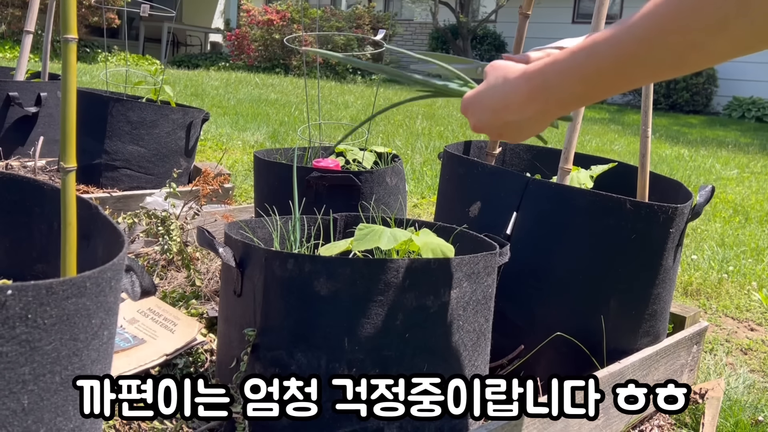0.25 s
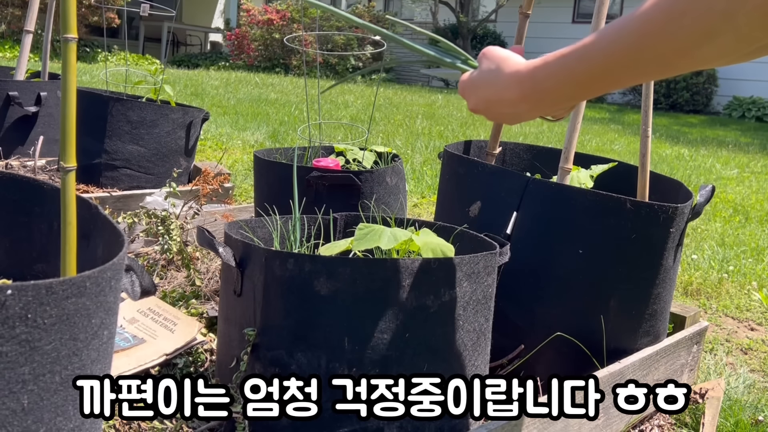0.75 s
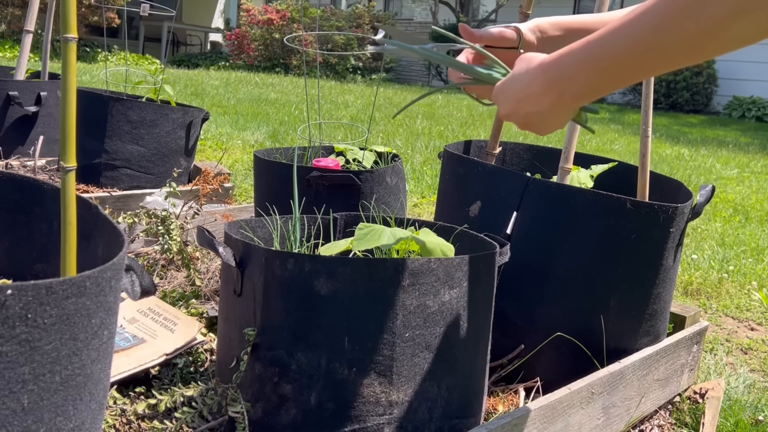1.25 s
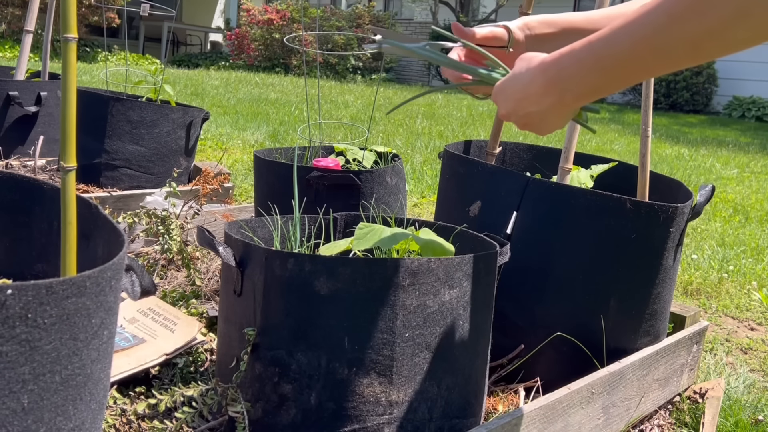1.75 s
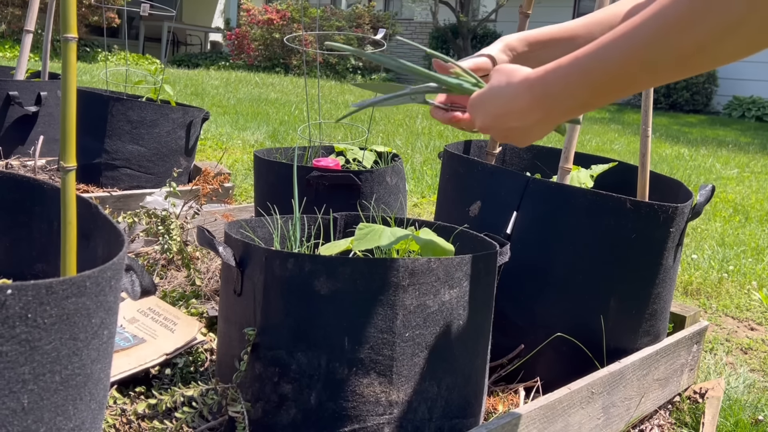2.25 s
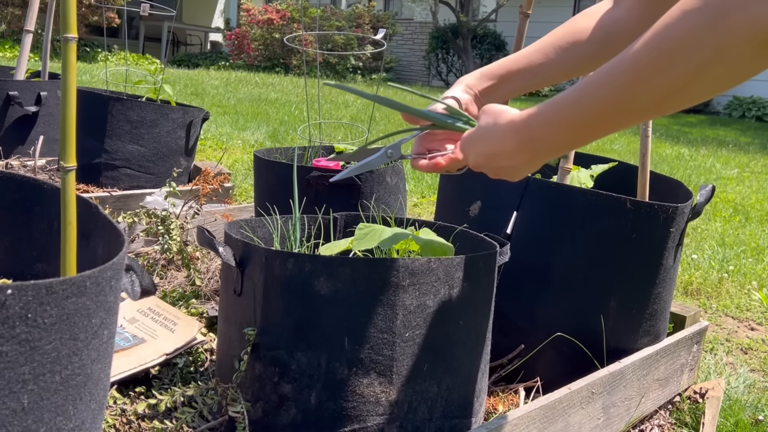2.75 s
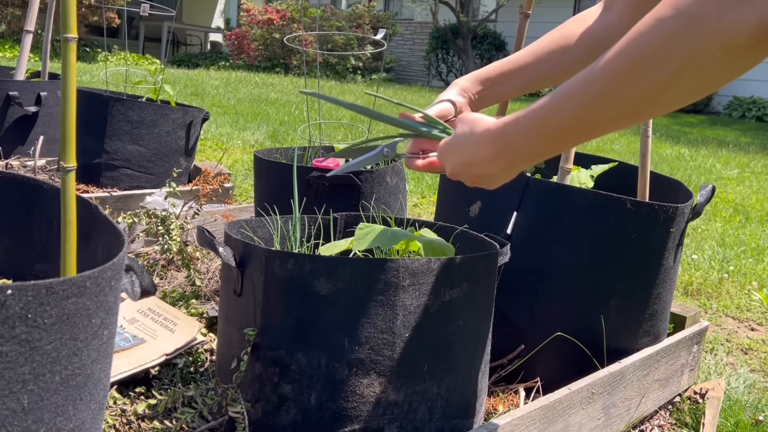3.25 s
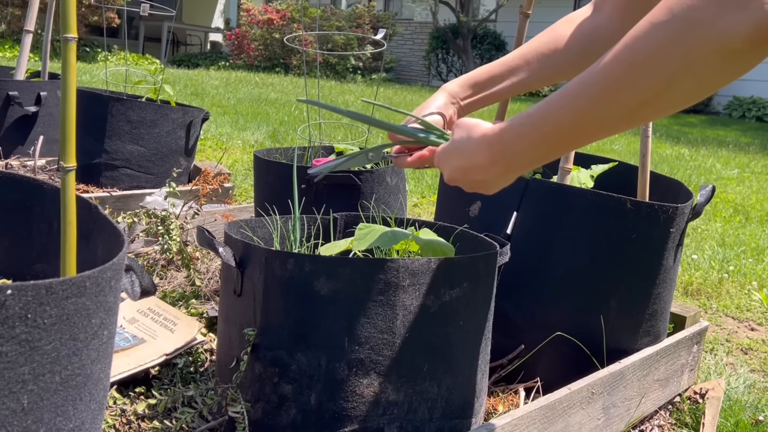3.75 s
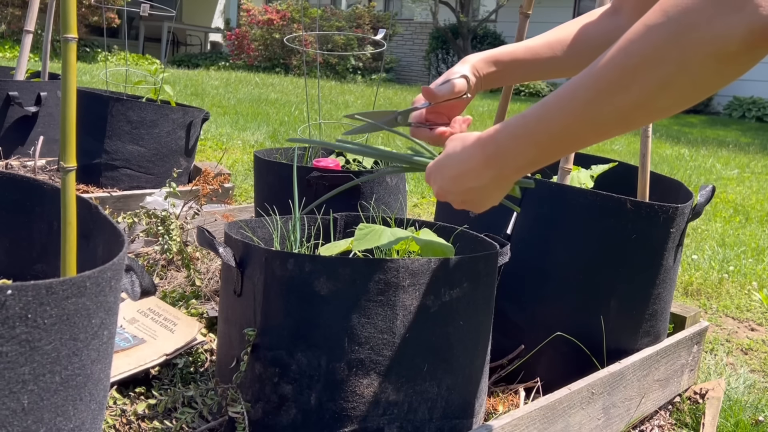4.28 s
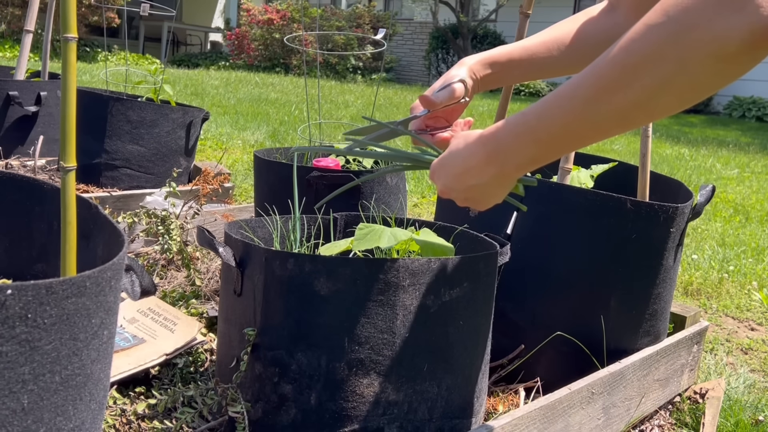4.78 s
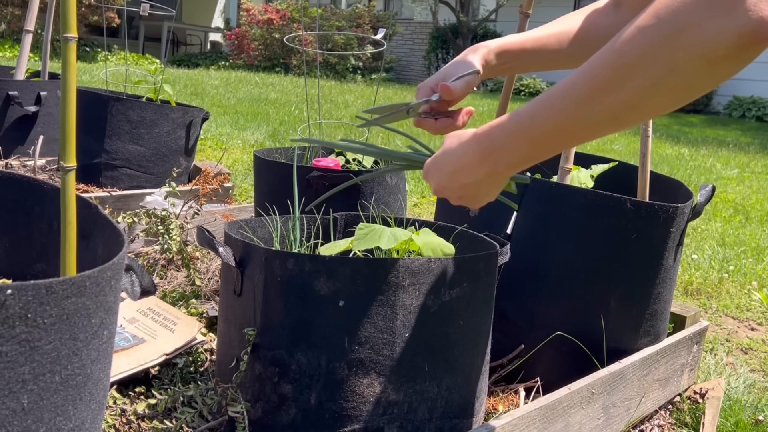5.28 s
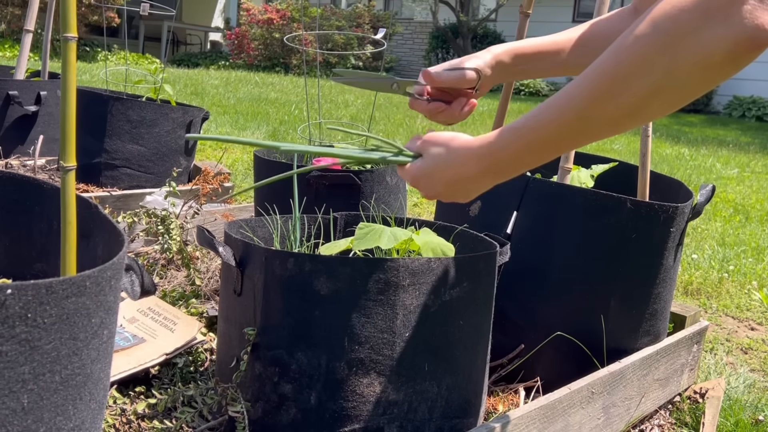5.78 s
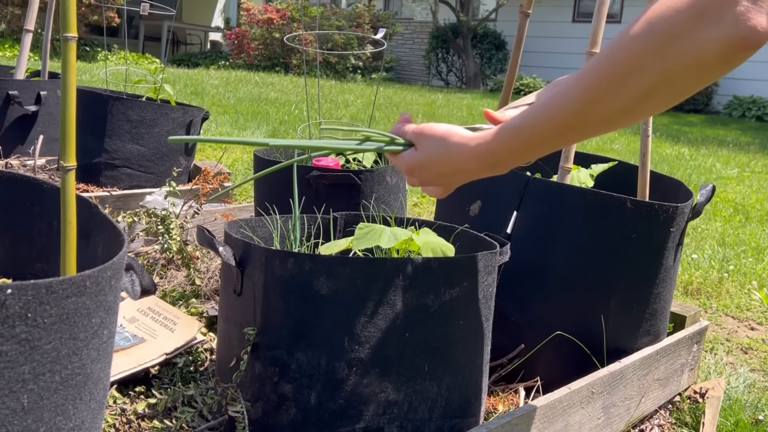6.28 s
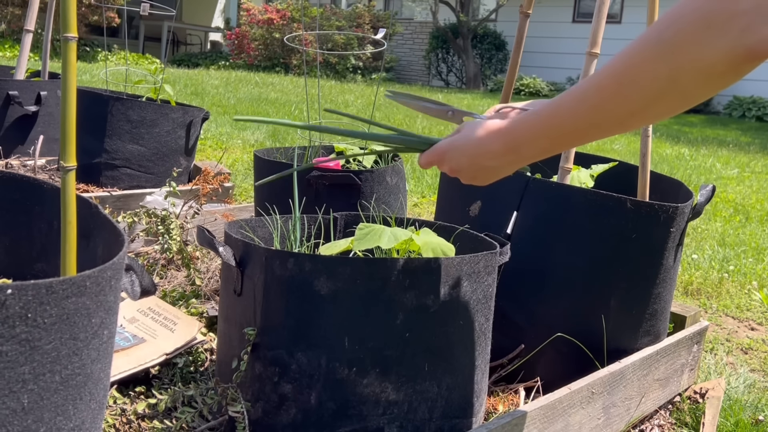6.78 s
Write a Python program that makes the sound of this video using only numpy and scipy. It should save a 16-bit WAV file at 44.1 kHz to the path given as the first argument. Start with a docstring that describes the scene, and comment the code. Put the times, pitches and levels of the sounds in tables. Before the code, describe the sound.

Close stereo pickup outdoors: five sharp, thin scissor snips through green stalks, unevenly spaced, with scraping blades and small fibre cracks just before closure. A dull, very short wall echo follows each. Behind them lie deep traffic rumble, faint motor hum, soft town wash and leaf hiss, with weak distant bird whistles and a few low bumps of air. Near the end the plastic handle knocks lightly, then only background remains.

```python
"""Far traffic and a motor murmur under faint blade ticks, then kitchen scissors snip green stalks five times.
Each snip is a rattling burst of contacts through the blade modes, with fibre cracks, gritty rubbing
and a dull wall echo; the plastic handle is tapped near the end. The scissors lie to one side of a
two-port microphone. Around them gliding sines peep as a bird, short low pulses puff on the microphone,
and shaped noise makes traffic, town, leaves, wind and fizz; narrow resonances and a throbbing sine make motors."""
import sys
import numpy as np
from scipy import signal
from scipy.fft import rfft, irfft
from scipy.io import wavfile
from scipy.ndimage import uniform_filter1d

SR = 44100
rng = np.random.default_rng(int(sys.argv[2]) if len(sys.argv) > 2 else 0)


def transcribe(u):
    """Save the signal u as a 16-bit wav file named by the first command-line argument.

    u: samples, shape (n,) or (channels, n), limited to [-1, 1]; the rate is SR.
    q: integer samples, one column per channel.
    """
    v = np.clip(np.atleast_2d(u).T, -1, 1)
    q = np.round(v * 32767).astype(np.int16)
    wavfile.write(sys.argv[1], SR, q)


N = 310023

# blades snapping shut: (time [s], energy [dB], colour at 2, 3, 4.3, 6.2, 11, 13 and 15 kHz
# [dB re 8 kHz, seven columns], rattle t60 [s], bounce strength [re rms 1 noise])
SNAP_BLOWS = [(1.9631, -12, -5, 2, 3, 4, 9, 11, 10, 0.028, 5.5),
              (3.0285, -20.5, -10, -4, 0.5, 2.5, 4.5, 10, -1, 0.022, 7),
              (3.7365, -11.5, 0, 3.5, 6.5, 7.5, 15, 13.5, 13.5, 0.026, 5.1),
              (4.9181, -8.5, -10, -11, -4.5, 0.5, 2, 6, 8.5, 0.023, 3.3),
              (5.5522, -5.5, -23.5, -23, -10, -7, -12, -2.5, -10.5, 0.021, 2.46)]
SNAP_PAN_DB = 0.5


def snaps():
    """The two steel blades meet at full closure and rattle against each other."""
    return blades(SNAP_BLOWS, SNAP_PAN_DB)


# fibres cracking and small blade ticks: (time [s], energy [dB], low, middle and treble colour
# [dB re 8 kHz, three columns])
TICK_BLOWS = [(0.036, -47, 5, 7, -8), (0.115, -40, -6, -3, -15), (.1655, -62, -14, -11, -4),
              (1.914, -55, -13, -10, 3), (1.927, -43, -4, 4, -2), (1.929, -44, -2, 6, -3),
              (1.936, -36, 0, 15, -6), (1.942, -32.5, 10, 13, -6), (1.952, -33, -25, -10, -1),
              (2.3, -43, 4, 15, -10), (3.161, -54, -8, -5, 3), (3.706, -44, -21, -14, 0),
              (3.718, -41, -14, -8, 6), (3.7295, -31, -22, -16, 6), (4.882, -48, -15, -12, 4),
              (4.888, -31.5, -15, 10, 9), (4.899, -31.5, -2, 13, 0), (4.902, -36, -3, 4, 2),
              (4.905, -36, 3, 0, 0), (4.9085, -40, -4, 2.5, -3), (5.1932, -43.5, -18, -15, 5),
              (5.427, -43, 15, 8, 1), (5.533, -38, -16, -13, -1.5), (5.539, -31, -25, -21, 6)]
TICK_T60_S, TICK_BOUNCE, TICK_PAN_DB = 0.018, 3.5, 1


def ticks():
    """Small blows, each with its own share of low, middle and treble range."""
    rows = []
    for s, level_db, low, mid, treble in TICK_BLOWS:
        colour = (low, low, mid - 3.0, mid, treble, treble, treble)
        rows.append((s, level_db, *colour, TICK_T60_S, TICK_BOUNCE))
    return blades(rows, TICK_PAN_DB)


# resonances of the steel blades: (frequency [Hz], width [Hz], lift [dB])
BLADE_MODES = [(2040, 180, 7.5), (3040, 340, 7), (4520, 406, 1.5), (6170, 500, 5), (7710, 360, 11),
               (8810, 930, 9.5), (11100, 1094, 4.5), (12900, 800, 0.5), (15140, 720, 3)]


def blades(rows, pan_db):
    """Each blow is a wide crack, lifted at the blade modes; how the blades meet sets its colour."""
    out, hz = np.zeros((2, N)), np.fft.rfftfreq(2048, 1 / SR)
    modes_db = sum(db / (1 + (2 * (hz - f) / width) ** 2) for f, width, db in BLADE_MODES)
    for s, level_db, db2, db3, db4, db6, db11, db13, db15, t60, bounce in rows:
        # thin steel sends no bass
        colour = [(500, db2 - 10.0), (2000, db2), (3000, db3), (4300, db4),
                  (5200, (db4 + db6) / 2 + 5.5), (6200, db6), (8000, 0), (11000, db11),
                  (13000, db13), (15300, db15), (16000, db15 - 11.0), (16800, db15 - 19.0)]
        response = causal(read(colour, hz) + modes_db)
        contacts = rattle(t60, alike=0.92, hard=9, bounce=bounce)
        crack = signal.fftconvolve(contacts, response, axes=1)
        add(out, s, gain_of(level_db) * crack / np.linalg.norm(crack[0]), pan_db)
    return out


RISE_S, BOUNCE_S = 0.0003, 0.0007  # contacts build up, then the bounce follows the hard contact
BODY_HZ, BODY_T60_S, BODY_LAG_S = 5820, 0.17, 0.0003  # below BODY_HZ contacts die sooner and speak later


def rattle(t60, alike, hard, bounce):
    """A hard contact, its bounce and quick uneven contacts around them; the lower modes speak
    a moment later and reach each port through slightly other near reflections."""
    t = np.arange(2048) / SR
    both, left, right, size = rng.standard_normal((4, len(t)))
    own = np.sqrt(1 - alike ** 2)
    contacts = np.array([both, alike * both + own * left, alike * both + own * right])
    contacts *= gain_of(2 * size) * np.minimum(t / RISE_S, 1)
    first = round(RISE_S * SR)
    contacts[:, first] = hard
    contacts[:, first + round(BOUNCE_S * SR)] = bounce
    low = signal.filtfilt(*signal.butter(N=2, Wn=BODY_HZ, fs=SR), contacts)
    body = low[1:] * gain_of(-60 * t / BODY_T60_S)
    body = np.roll(body, round(BODY_LAG_S * SR), axis=1)
    treble = contacts[0] - low[0]  # the same in both ports
    return (treble + body) * gain_of(-60 * t / max(t60, .002))


# blades shearing and rubbing along each other: (peak time [s], upper-mode peak [dB], rise [s],
# fall [s], lower modes [dB re upper])
RUB_STROKES = [(.114, -85, .035, .045, 11), (.166, -78, .015, .07, 3), (.32, -96, .1, .1, 12),
               (1.958, -49.5, 0.033, 0.017, -4), (1.98, -74.5, 0.014, 0.09, 7.5),
               (2.072, -75.5, 0.025, 0.095, 3), (2.298, -82, 0.018, .06, -2), (3.0, -83, 0.08, 0.054, 4),
               (3.045, -93, 0.023, 0.13, 18.5), (3.119, -84, .05, .035, -10),
               (3.161, -70, 0.012, 0.024, -6), (3.731, -55, 0.02, .012, -4), (3.71, -81, 0.071, .05, 7),
               (3.755, -76.5, .012, 0.074, 9.5), (3.855, -75, 0.025, 0.05, -3),
               (4.914, -57, 0.035, 0.014, -1), (4.972, -77.5, .1, 0.076, 2.5),
               (5.038, -75, 0.022, .055, -7), (5.551, -55.5, 0.019, 0.0083, 3.5),
               (5.59, -84.5, 0.076, 0.08, 17), (5.676, -94, 0.089, .15, 12), (6.637, -99, 0.12, .15, 12)]
# lower rubbing modes: (frequency [Hz], width before narrowing [Hz], level [dB])
RUB_MODES = [(6860, 4100, 7), (9100, 300, 9), (11500, 900, -4), (12700, 1450, -8.5)]
RUB_SWING_DB, LOWER_SHARE = 25.5, 0.72  # swell depth, and the lower modes' share of it
RUB_FROM_HZ = 5000


def rub():
    """Grainy friction of steel on steel and stalk in the upper blade modes; the lower modes swell and fade less."""
    t, upper, lower = np.arange(N) / SR, np.zeros(N), np.zeros(N)
    for s, level_db, rise, fall, lower_db in RUB_STROKES:
        away = np.maximum((s - t) / rise, (t - s) / fall)
        upper += gain_of(level_db - RUB_SWING_DB * away) * (away < 1)
        lower += gain_of(level_db + lower_db - LOWER_SHARE * RUB_SWING_DB * away) * (away < 1)
    rough = uniform_filter1d(rng.standard_normal((2, N)), 90)
    fine, grit = rng.standard_normal((2, N)) * gain_of(3.4 * evened(rough))
    top = evened(resonate(resonate(fine, 15000, 1400), 15000, 1400))
    top = signal.sosfilt(signal.butter(N=12, Wn=15800, fs=SR, output="sos"), top)
    bottom = evened(ring(grit, RUB_MODES, widen=0.93))
    bottom = signal.lfilter(*signal.butter(N=4, Wn=RUB_FROM_HZ, btype="high", fs=SR), bottom)
    sound = upper * top + lower * bottom
    return np.array([sound, sound])


# the handle taps: (time [s], energy [dB], rattle t60 [s], left-right balance [dB])
HANDLE_TAPS = [(5.8622, -48, 0.0064, 4), (5.8715, -19, 0.016, 8.5), (5.889, -40, .006, -1)]
# resonances of the hollow plastic: (frequency [Hz], width [Hz], level [dB])
HANDLE_MODES = [(960, 250, -5.5), (2020, 140, -9), (2480, 120, -2), (3200, 280, 0.5), (4330, 900, -8),
                (6650, 740, -20), (7540, 370, -13.5), (9270, 470, -20)]


def handle():
    """A hollow plastic tap: uneven contacts ring the handle modes."""
    out = np.zeros((2, N))
    for s, level_db, t60, pan_db in HANDLE_TAPS:
        tap = ring(rattle(t60, alike=0.7, hard=20, bounce=0), HANDLE_MODES, widen=1)
        tap = signal.lfilter(*signal.butter(N=2, Wn=550, btype="high", fs=SR), tap)
        add(out, s, gain_of(level_db) * tap / np.linalg.norm(tap[0]), pan_db)
    return out


# how the two ports hear the scissors' side: (frequency [Hz], phase lead of the left port [rad])
PORT_LEAD = [(0, 0), (1000, -1.5), (2000, 0), (3000, 1.2), (4500, .8), (6000, .6), (7300, 1.4), (8000, 1),
             (10000, -3.1), (12000, -6.1), (14000, -9.6), (15500, -12.6), (22050, -12.6)]


def aside(pair):
    """Turns the phase of the left port as for sound from the scissors' side."""
    turn = np.exp(1j * np.interp(np.fft.rfftfreq(N, 1 / SR), *np.transpose(PORT_LEAD)))
    return np.array([irfft(rfft(pair[0]) * turn, N), pair[1]])


WALL_DB, WALL_T60_S = -29, 0.024


def garden(x):
    """A dull smeared echo from a wall, about 25 ms late, and a thin scatter from pots and hedges."""
    t = np.arange(SR // 4) / SR
    taps = rng.choice([-1., 1.], (2, len(t))) * (rng.random((2, len(t))) < .05)
    scatter = taps[0] * gain_of(-46 - 60 * t / .2) * (t > .004)
    wall_rise = np.clip((t - .0225) / 0.0022, 0, 1)
    wall = taps * gain_of(WALL_DB - 60 * (t - .0245) / WALL_T60_S) * wall_rise
    dull = signal.lfilter(*signal.butter(N=4, Wn=[4500, 9500], btype="band", fs=SR), wall)
    return signal.fftconvolve(x, scatter + dull, axes=1)[:, :N]


# bird peeps and low pips: (start time [s], length [s], first pitch [Hz], last pitch [Hz], level [dB],
# loudest point [share of length], flutter [dB], pitch waver [share])
BIRD_PEEPS = [(1.6, 0.035, 4850, 4980, -79, .45, 4, .006), (1.772, 0.04, 2650, 2720, -82, .4, 4, .006),
              (1.81, .05, 2700, 3050, -76.5, 0.3, 3, .008), (2.064, 0.03, 1520, 1480, -70.5, 0.35, 0, .008),
              (2.243, 0.085, 2620, 2850, -70, 0.68, 2, .004), (2.324, .05, 2790, 2750, -81, .45, 4, .004),
              (2.401, 0.045, 3200, 3280, -85, 0.4, 5.5, .015),
              (2.443, 0.073, 3300, 3610, -80, .65, 4.5, 0.011),
              (2.617, 0.019, 5950, 6600, -74, 0.4, 3, .006),
              (2.641, 0.0082, 6500, 4130, -66, 0.25, 2, .006),
              (4.708, 0.113, 3340, 3260, -80, 0.56, 3, .005), (4.715, 0.13, 4540, 4500, -80, .45, 3, .012),
              (4.985, .025, 2900, 2820, -80, .5, 1, .006), (5.34, .06, 5700, 5700, -80, 0.49, 4.5, .03),
              (5.42, 0.017, 1840, 1840, -79, 0.41, 4, .01), (5.45, 0.032, 1880, 1850, -80, .4, 4.5, .01)]
LEAVES_ECHO_DB, LEAVES_T60_S = -5, 0.03


def bird():
    """Thin gliding whistles far off, broken up by the air and the leaves that they cross."""
    out = np.zeros(N)
    waver, flutter = (evened(uniform_filter1d(v, 200)) for v in rng.standard_normal((2, N)))
    for s, length, from_hz, to_hz, level_db, top, flutter_db, share in BIRD_PEEPS:
        at = np.arange(round(s * SR), round((s + length) * SR))
        u = np.linspace(0, 1, len(at))
        arch = np.sin(np.pi * u ** (np.log(.5) / np.log(np.clip(top, .1, .9))))
        hz = (from_hz + (to_hz - from_hz) * u) * (1 + share * waver[at])
        level = np.sqrt(2) * gain_of(level_db + flutter_db * flutter[at]) * arch ** .8
        out[at] += level * np.sin(2 * np.pi * np.cumsum(hz) / SR)
    t = np.arange(4096) / SR
    leaves = rng.standard_normal((2, len(t))) * gain_of(-60 * t / LEAVES_T60_S)
    leaves *= gain_of(LEAVES_ECHO_DB) / np.linalg.norm(leaves[0])
    return out + signal.oaconvolve(out[None], leaves, axes=1)[:, :N]


# air puffing on the microphone: (centre offset from start is half the length)
# (start time [s], peak [dB], frequency [Hz], length [s], left-right balance [dB])
AIR_PUFFS = [(3.209, -38, 61.86, 0.026, 9), (3.676, -34.5, 61.5, 0.036, 3),
             (4.147, -30.5, 63.3, 0.037, 7.5), (6.419, -33, 56.6, 0.0556, 4), (6.452, -29, 66.6, 0.029, -2)]


def puffs():
    """Short low pushes of air, each an arched piece of a cosine."""
    out = np.zeros((2, N))
    for s, peak_db, hz, length, pan_db in AIR_PUFFS:
        t = np.arange(0, length, 1 / SR) - length / 2
        push = -gain_of(peak_db) * np.cos(2 * np.pi * hz * t) * np.cos(np.pi * t / length)
        add(out, s, np.array([push, push]), pan_db)
    return out


# lines of the motor: (frequency [Hz], width [Hz], level [dB])
MOTOR_LINES = [(216.45, 5.4, -68.5), (1119, 3.22, -89), (1185, 6, -86.5), (1256, 3, -96.5),
               (1298, 3.7, -90), (1333, 4.6, -91)]


def hum():
    """Wavering lines of a distant motor: noise through narrow resonances."""
    lines = [gain_of(db) * evened(resonate(rng.standard_normal(N), hz, width)) for hz, width, db in MOTOR_LINES]
    return sum(lines)


# slow course of the traffic, before each layer's trim; the drone follows the deep column too:
# (time [s], deep rumble level [dB], upper rumble level [dB])
TRAFFIC_LEVELS = [(0, -47, -52), (.4, -52.5, -49.5), (.9, -51, -54.5), (1.3, -53, -52.5),
                  (1.8, -54.5, -54.5), (2.3, -55, -54.5), (2.7, -51, -53), (3.1, -49, -55.5),
                  (3.5, -52.5, -53), (4, -49, -54), (4.5, -51.5, -53), (5, -54, -52.5), (5.5, -50, -52.5),
                  (6.1, -55, -54), (6.6, -49, -52), (7.03, -48, -54)]
ENGINE_DB, ENGINE_HZ, DRIFT = 1, 61.65, 0.07065  # level re deep rumble, pitch, rms pitch drift as a share
THROB_DB, THROB_HZ = 3.5, 9.7


def drone():
    """The wandering, throbbing lowest order of a far engine."""
    s, deep_db, _ = np.transpose(TRAFFIC_LEVELS)
    throb = evened(gain_of(THROB_DB * wander(THROB_HZ)))
    level = throb * gain_of(np.interp(np.arange(N) / SR, s, deep_db) + ENGINE_DB)
    hz = ENGINE_HZ * (1 + DRIFT * wander(3.48))
    return np.sqrt(2) * level * np.sin(2 * np.pi * np.cumsum(hz) / SR)


# noise colours of traffic, of town and leaves, of wind, and of a thin fizz from the scissors' side:
# each (frequency [Hz], relative density [dB per Hz])
TRAFFIC_COLOUR = [(11, -57.5), (18, -28.5), (27, -13), (30, -15.5), (40, -6), (49, -4.5), (65, -4.5),
                  (92, -6.5), (121, -8), (188, -18.5), (221, -14), (242, -20.5), (284, -23.5), (370, -28),
                  (600, -32.5), (780, -65), (1320, -120)]
HISS_COLOUR = [(260, -31), (450, -2), (490, -0.5), (745, -3.5), (842, -3.5), (1230, -9), (1330, -6.5),
               (1580, -10), (2400, -15.5), (3870, -20), (5330, -16), (6330, -15.5), (8500, -26),
               (11000, -57.5), (18700, -120)]
WIND_COLOUR = [(25, -34.5), (40, -11.5), (60, -5), (90, 8.5), (150, -21.5), (300, -20.5), (600, -76.5)]
FIZZ_COLOUR = [(6500, -33), (8000, 1.5), (10000, -2.5), (12000, -5), (13000, -10), (14000, -15.5),
               (16500, -35)]
# likeness of the two ports for far sound: (frequency [Hz], left-right likeness [-1 to 1])
PORT_LIKENESS = [(30, 0.53), (60, .85), (130, 0.96), (290, 0.76), (640, -0.22), (1410, -0.33), (3100, 0.31),
                 (6820, -0.02), (15000, -0.46)]
# balance of the two ports for far sound: (frequency [Hz], left-right balance [dB])
PORT_BALANCE = [(60, 0.32), (180, 2), (550, 1.5), (1650, 1), (4970, 7.9), (15000, 4.3)]
DEEP_DB, WIND_DB = -0.5, -6  # re the deep rumble course
TOWN_DB, LEAVES_DB, FIZZ_DB = -67.5, -72, -88
SWELL_DB = 0.35  # rms of the slow level changes of town and leaves


def ambience():
    """Coloured noise in layers: two of traffic rumble, town wash, leaf hiss, wind and fizz."""
    hz, t = np.fft.rfftfreq(N, 1 / SR), np.arange(N) / SR
    left, other, near, *wind = rfft(rng.standard_normal((5, N)))
    side = rfft(aside(irfft(np.array([near, near]), N)))
    same = np.clip(read(PORT_LIKENESS, hz), -1, 1)
    lean = gain_of(read(PORT_BALANCE, hz) / 2)
    right = same * left + np.sqrt(1 - same ** 2) * other
    far = np.array([left * lean, right / lean])
    s, deep_db, upper_db = np.transpose(TRAFFIC_LEVELS)
    deep_db, upper_db = np.interp(t, s, deep_db), np.interp(t, s, upper_db)
    town_db = TOWN_DB + SWELL_DB * wander(1)
    leaves_db = LEAVES_DB + SWELL_DB * wander(1)
    # (noise, colour, from [Hz], to [Hz], level [dB])
    layers = ((far, TRAFFIC_COLOUR, 0, 95, deep_db + DEEP_DB),
              (far, TRAFFIC_COLOUR, 95, 500, upper_db),
              (far, HISS_COLOUR, 500, 3000, town_db),
              (far, HISS_COLOUR, 3000, SR, leaves_db),
              (np.array(wind), WIND_COLOUR, 0, SR, deep_db + WIND_DB),
              (side, FIZZ_COLOUR, 0, SR, FIZZ_DB))
    out = np.zeros((2, N))
    for noise, colour, lo, hi, level_db in layers:
        band = irfft(noise * gain_of(read(colour, hz)) * (hz >= lo) * (hz < hi), N)
        out += evened(band) * gain_of(level_db)
    return out


def gain_of(db):
    """Decibels to a factor."""
    return 10 ** (np.asarray(db) / 20)


def evened(x):
    """Scales to rms 1."""
    return x / np.sqrt(np.mean(x ** 2) + 1e-20)


def read(points, hz):
    """Reads a spectrum table on a log-frequency axis."""
    f, value = np.transpose(points)
    return np.interp(np.log(hz + 1), np.log(f + 1), value)


def wander(rate_hz):
    """Slow random curve of rms 1 with changes mostly below rate_hz."""
    hz = np.fft.rfftfreq(N, 1 / SR)
    return evened(irfft(rfft(rng.standard_normal(N)) / (1 + (hz / rate_hz) ** 4), N))


def resonate(x, hz, width):
    """A two-pole resonance of about gain 1 at its centre."""
    r = np.exp(-np.pi * width / SR)
    pole = np.clip(r, 0, 1 - 1e-6) * np.exp(2j * np.pi * hz / SR)
    return 2 * signal.lfilter([1 - abs(pole)], [1, -pole], x).real


def ring(x, modes, widen):
    """Sum of resonances, neighbours in opposite sign."""
    return sum((-1) ** k * gain_of(db) * resonate(x, hz, widen * width)
               for k, (hz, width, db) in enumerate(modes))


def causal(db):
    """The minimum-phase response that has this gain and starts at once."""
    log_gain = np.log(gain_of(np.r_[db, db[-2:0:-1]]))
    return np.fft.ifft(np.exp(np.conj(signal.hilbert(log_gain)))).real[None, :512]


def add(mix, s, pair, pan_db):
    """Places two signals in the two ports."""
    for port, sound, db in zip(mix, pair, (pan_db / 2, -pan_db / 2)):
        part = port[round(s * SR):][:len(sound)]
        part += gain_of(db) * sound[:len(part)]


def scene():
    """Scissors with their echoes over the garden background."""
    hits = aside(snaps() + handle())
    scissors = hits + garden(hits) + aside(ticks() + rub())
    return scissors + bird() + puffs() + hum() + drone() + ambience()


EDGE_HZ = 16500


def record(dry):
    """The low cut of the microphone and the band limit of the recorder."""
    cut = signal.sosfilt(signal.butter(N=2, Wn=38, btype="high", fs=SR, output="sos"), dry)
    band_limit = signal.firwin(511, EDGE_HZ, window=("kaiser", 9), fs=SR)
    return signal.oaconvolve(cut, band_limit[None], "same")


dry = scene()
out = record(dry)
transcribe(out)
```